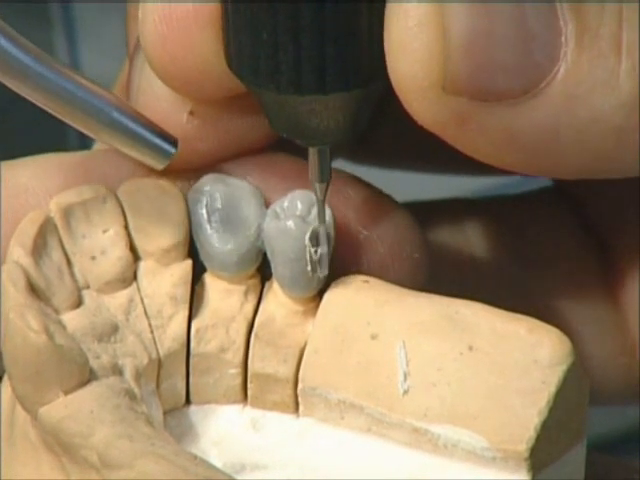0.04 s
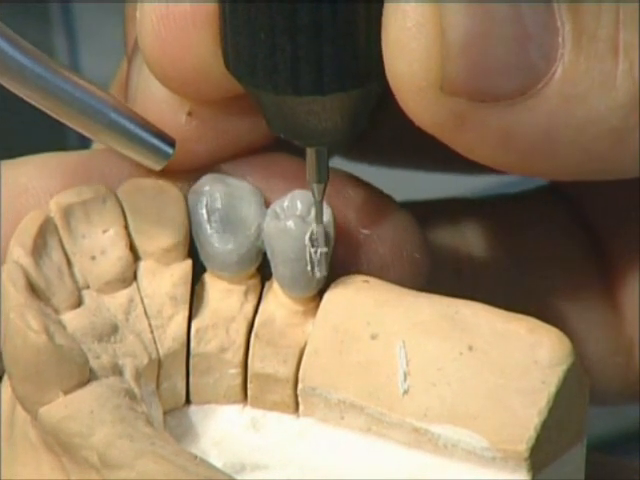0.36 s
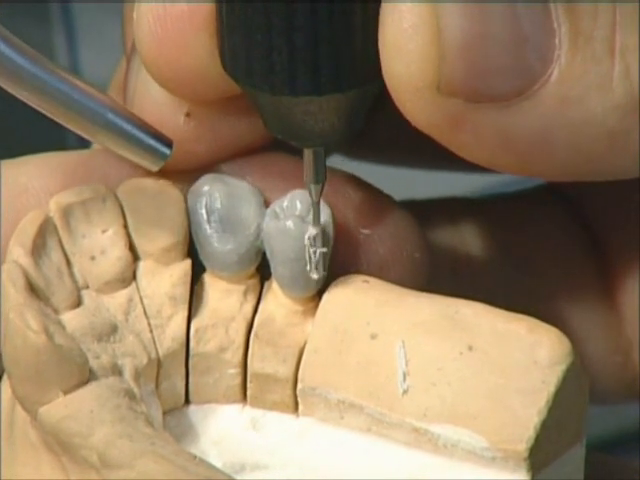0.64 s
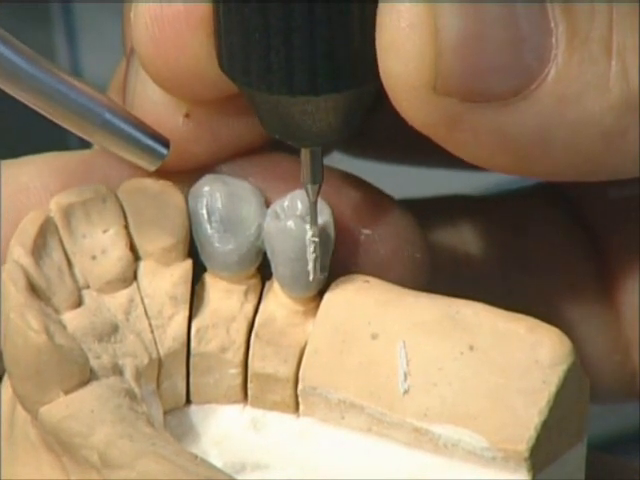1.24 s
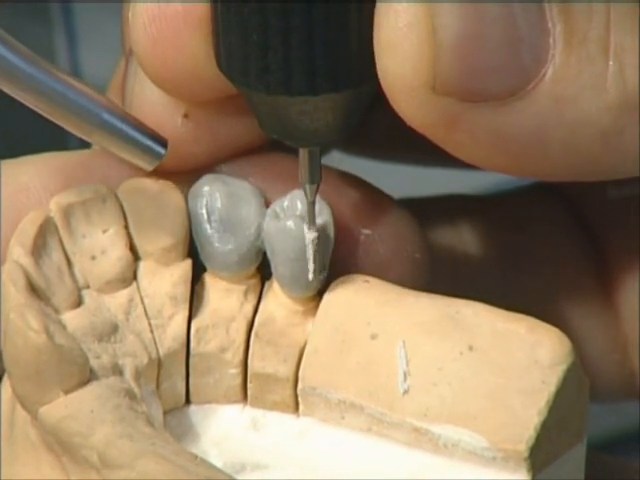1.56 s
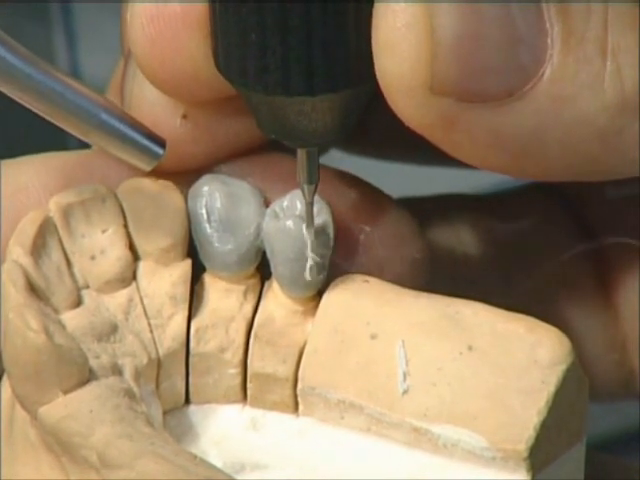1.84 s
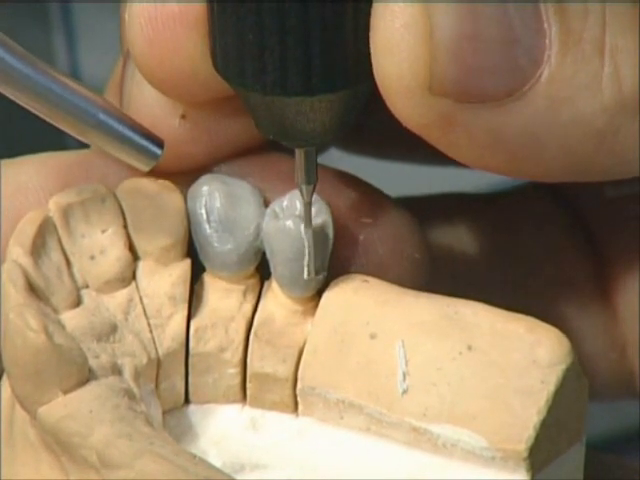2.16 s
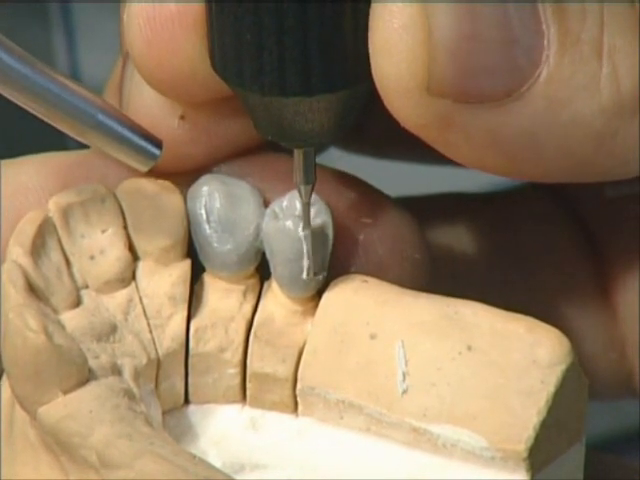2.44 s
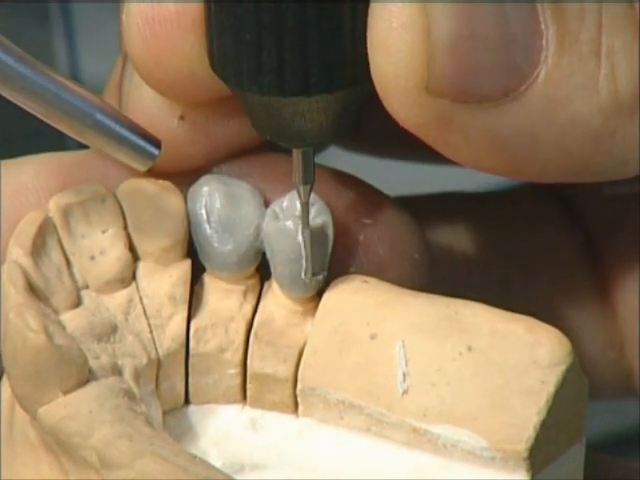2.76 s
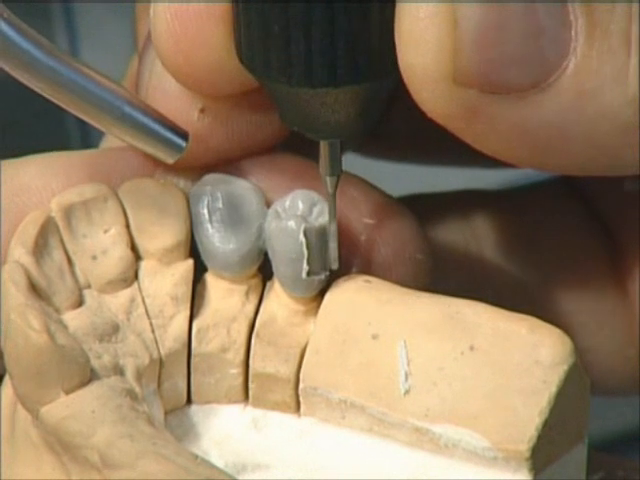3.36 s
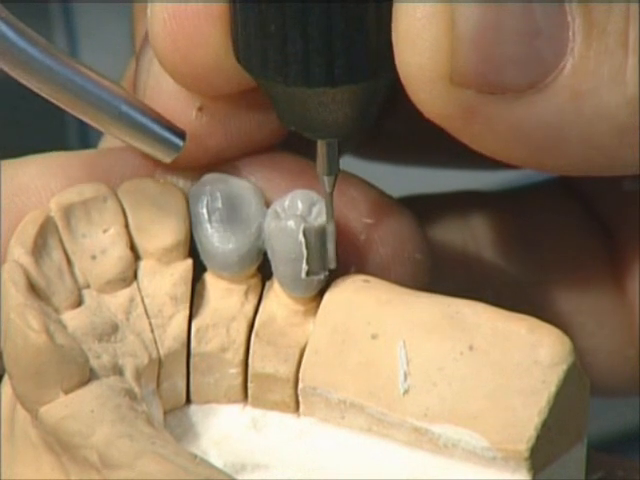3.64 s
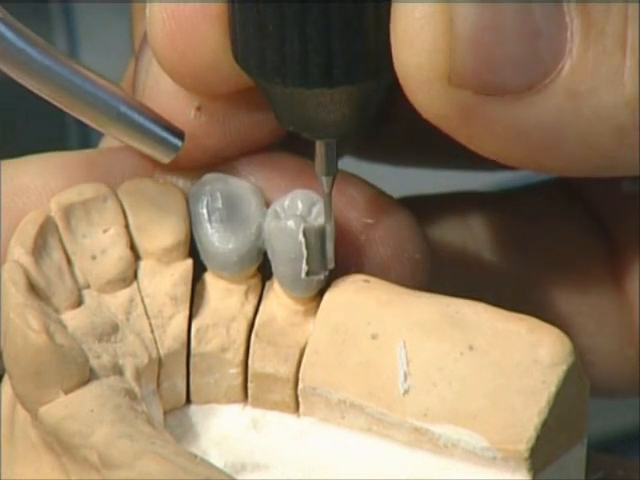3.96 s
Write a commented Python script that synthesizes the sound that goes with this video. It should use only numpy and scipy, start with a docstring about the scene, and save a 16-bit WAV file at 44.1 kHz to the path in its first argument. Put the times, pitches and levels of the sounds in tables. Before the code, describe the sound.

A dental milling handpiece trims a wax crown with a loud, bright air hiss and a thin whine. It hums under pressure, then lifts off, speeds up slightly and whistles faintly. Close and mono in a workshop.

```python
"""A loud, bright hiss with a thin whine inside it: a dental milling handpiece trimming a wax crown.
Air streams steadily through a thin tube aimed at the work and rushes over the plaster model.
As the bur presses in, the spindle slows and hums once per turn; near 3 s it lifts off and speeds up,
and a bearing whistles. Workshop machines drone faintly underneath. Close and mono."""
import sys
import numpy as np
from scipy import signal
from scipy.fft import rfft, irfft
from scipy.io import wavfile
from scipy.ndimage import uniform_filter1d

SR = 44100
rng = np.random.default_rng(int(sys.argv[2]) if len(sys.argv) > 2 else 0)


def put_to_file(sound):
    """Save the sound as 16-bit audio at rate SR, in the file named by the first command-line argument."""
    columns = np.atleast_2d(sound).T  # one column per channel
    safe = np.clip(columns, -1, 1)
    whole_steps = np.round(safe * 32767)
    wavfile.write(sys.argv[1], SR, whole_steps.astype(np.int16))


N = 176400
TIME = np.arange(N) / SR

# how far the bur stands clear of the crown: t/s, clearance/0-1
BUR_CLEARANCE = [(0, 0.1), (.6, 0.2), (2.9, 0), (3.25, .5), (3.6, 1), (4, 1)]


def amp(db):
    """Decibels to gain."""
    return 10 ** (np.asarray(db) / 20)


def unit(x):
    """Scales to an rms of one."""
    return x / np.sqrt(np.mean(x ** 2) + 1e-20)


def curve(points):
    """Automation lane: straight lines through rows of t/s, value."""
    return np.interp(TIME, *np.transpose(points))


def equalise(x, bands):
    """EQ curve through rows of f/Hz, level/dB, joined on a log frequency axis."""
    band_hz, band_db = np.transpose(bands)
    hz = np.fft.rfftfreq(N, 1 / SR)
    gain = amp(np.interp(np.log(hz + 1), np.log(band_hz + 1), band_db))
    return irfft(rfft(x) * gain, N)


def wander(rate_hz):
    """Smooth random modulator with an rms of one, rolling off above the given rate."""
    hz = np.fft.rfftfreq(N, 1 / SR)
    roll_off = np.exp(-(hz / rate_hz) ** 2) * (hz > 0)
    return unit(irfft(rfft(rng.standard_normal(N)) * roll_off, N))


def turbulence(resonances):
    """Turbulent air: noise that flickers in short spectral patches, coloured by fixed resonances."""
    patch_db = 0.5
    noise_grid = signal.stft(rng.standard_normal(N), nperseg=256)[2]
    patches = uniform_filter1d(rng.standard_normal(noise_grid.shape), size=9, axis=0)  # across frequency
    patches = unit(uniform_filter1d(patches, size=10, axis=1))  # across time
    noise = signal.istft(noise_grid * amp(patch_db * patches), nperseg=256)[1][:N]
    return unit(equalise(noise, resonances))


def air_jet():
    """Air hisses from the tube and rushes over the model; the hiss changes colour as the bur clears."""
    # tone shape of the bright hiss from the tube: f/Hz, level/dB
    hiss_eq = [(700, -51), (1100, -27), (1300, -17.5), (1680, -14.5), (1850, -19), (2000, -26), (2130, -28),
               (2250, -31), (2400, -27), (2520, -27), (2800, -20), (3500, -17.5), (4250, -10.5),
               (4750, -8.5), (5300, -12), (5550, -16.5), (6900, -13.5), (7250, -10), (7570, -2.5),
               (7850, -1.5), (8100, -5), (8350, -3), (9250, -9.5), (10100, -2.5), (10600, 1.5),
               (11000, -5.5), (11700, -18), (12900, -27), (13500, -20), (13800, -15.5), (14100, -23),
               (14400, -23), (15000, -34)]
    # extra EQ on the hiss with the bur clear: f/Hz, level/dB
    clear_eq = [(1800, 0), (3700, -1.5), (5450, 0.5), (5850, 2.5), (6400, -0.5), (7700, 0), (8400, -2.5),
                (9300, 1), (11400, 0), (12500, 2.5), (13900, -1.5)]
    # tone shape of the low rush over the model: f/Hz, level/dB
    rush_eq = [(12, -8), (30, -14), (85, -20), (135, -12), (185, -10), (230, -6), (365, -7.5), (425, -0.5),
               (470, -5.5), (550, -3), (650, -7.5), (770, -1.5), (870, -1.5), (1040, -10.5), (1200, -8.5),
               (1600, -27.5)]
    hiss_db, rush_db = -22, -49
    swell_db, flutter_db = -0.09, 0.1
    lift_s, lift_width_s, hiss_lift_db, rush_lift_db = 3.16, 0.13, 0.6, 2.4
    flow = amp(swell_db * wander(rate_hz=5) + flutter_db * wander(rate_hz=80))
    lift = np.exp(-((TIME - lift_s) / lift_width_s) ** 2)  # brief swell as the bur lifts off
    clearance = curve(BUR_CLEARANCE)
    hiss = turbulence(hiss_eq)
    hiss = (1 - clearance) * hiss + clearance * equalise(hiss, clear_eq)
    hiss *= amp(hiss_db + hiss_lift_db * lift)
    rush = amp(rush_db + rush_lift_db * lift) * turbulence(rush_eq)
    return flow * (hiss + rush)


def spindle():
    """Shaft and bearing tones track the speed: a hum under pressure, a whistle with the bur clear."""
    # rotation rate, sagging during the cut: t/s, f/Hz
    rotation = [(0, 269.4), (.6, 263.3), (1.0, 260.6), (1.9, 257.3), (2.4, 257.6), (2.85, 257.0),
                (3.2, 264.9), (3.55, 270.0), (4, 272.4)]
    # pressure of the bur on the wax: t/s, pressure/0-1
    bur_pressure = [(0, 0.19), (.25, 0.08), (.7, 0.31), (1.1, 0.5), (1.65, 0.98), (2.5, 1.0), (2.94, 1),
                    (3.03, 0.3), (3.2, .04), (4, 0.07)]
    # shaft and bearing tones: multiple of the rotation rate
    orders = [1, 2, 8, 9, 14, 18, 20.3, 21.65, 22.65, 25.08, 25.65, 27.08, 44, 45.6, 46.8]
    # those tones running free, ahead of the body resonance: level/dB
    free_levels = [-73, -62.5, -59, -63, -65, -45.5, -62, -65, -50.5, -56, -56, -61, -53, -62, -57, -68]
    # those tones while cutting, ahead of the body resonance: level/dB
    cutting_levels = [-46, -70, -66, -59.5, -54.5, -76, -52, -60, -69, -49, -59, -51, -59, -63, -63]
    body_hz, body_width_hz, body_db = 2360, 52, 5.5
    waver_hz, whine_waver_db, hum_waver_db = 6.7, 1.4, 0.6
    whistle_order, whistle_db = 21.33, -46.5
    speed_hz, pressure = curve(rotation), curve(bur_pressure)
    jitter = 1 + 0.00026 * wander(rate_hz=21)
    turns = np.cumsum(speed_hz * jitter) / SR
    tones = np.zeros(N)
    for order, free_db, cutting_db in zip(orders, free_levels, cutting_levels):
        level = (1 - pressure) * amp(free_db) + pressure * amp(cutting_db)
        # the handpiece body resonates, lifting a tone as it glides past
        detuning = (order * speed_hz - body_hz) / body_width_hz
        body_gain = amp(body_db / (1 + detuning ** 2))
        waver_db = hum_waver_db if order == 1 else whine_waver_db
        waver = amp(waver_db * wander(waver_hz))
        tone = np.sin(2 * np.pi * (order * turns + rng.random()))
        tones += level * body_gain * unit(waver * tone)
    waver = amp(whine_waver_db * wander(waver_hz))
    whistle = unit(waver * np.sin(2 * np.pi * whistle_order * turns))
    return tones + amp(whistle_db) * curve(BUR_CLEARANCE) * whistle


def workshop_drone():
    """Machines in the room lay down a faint bed of steady tones."""
    # machine hum: f/Hz, level/dB
    machine_tones = [(100, -75.5), (200, -75.5), (333.5, -65), (409, -67)]
    drone = np.zeros(N)
    for hz, db in machine_tones:
        drone += amp(db) * unit(np.sin(2 * np.pi * (hz * TIME + rng.random())))
    return drone


def scene():
    """Air, spindle and workshop, the same in both channels."""
    mono = air_jet() + spindle() + workshop_drone()
    return np.array([mono, mono])


def record(dry):
    """A steep high cut takes the very top off the hiss."""
    cutoff_hz = 14650
    low_pass = signal.firwin(401, cutoff_hz, window=("kaiser", 9), fs=SR)
    return signal.oaconvolve(dry, low_pass[None], "same")


dry = scene()
out = record(dry)
put_to_file(out)
```